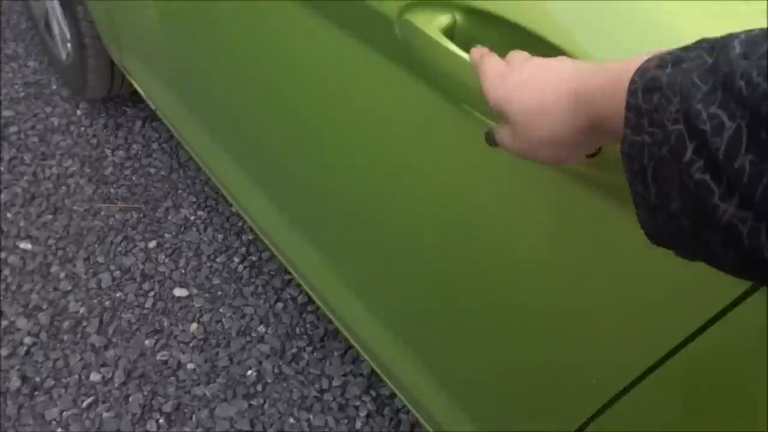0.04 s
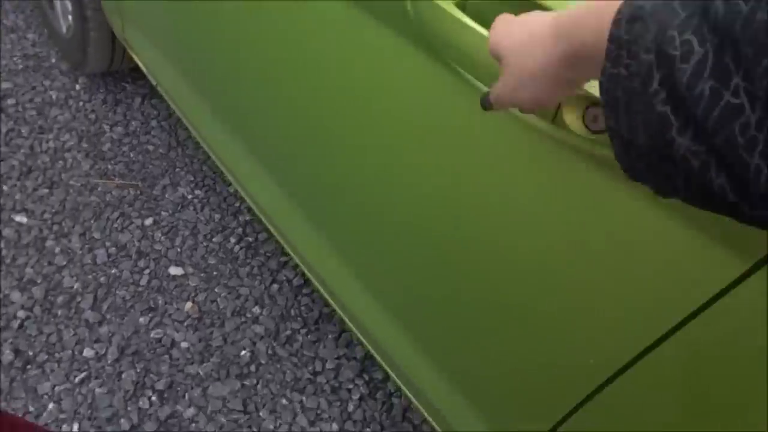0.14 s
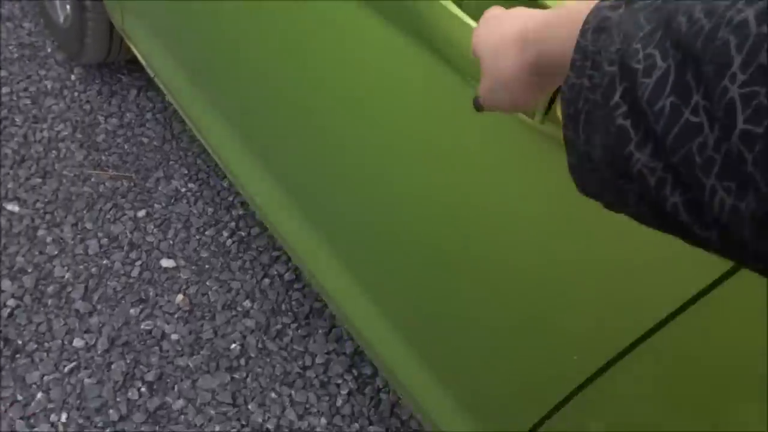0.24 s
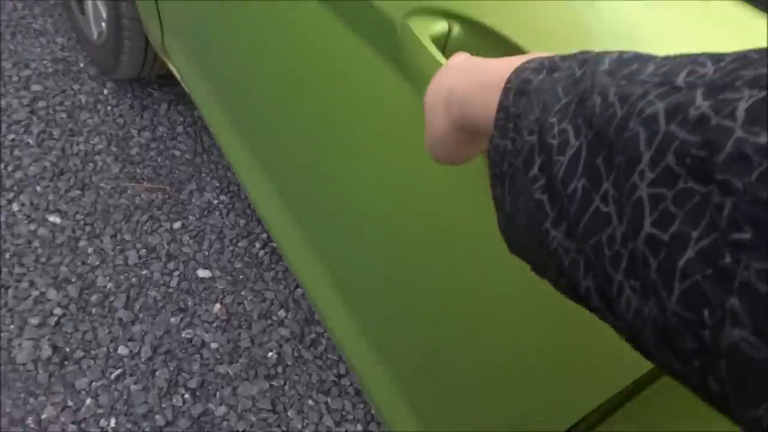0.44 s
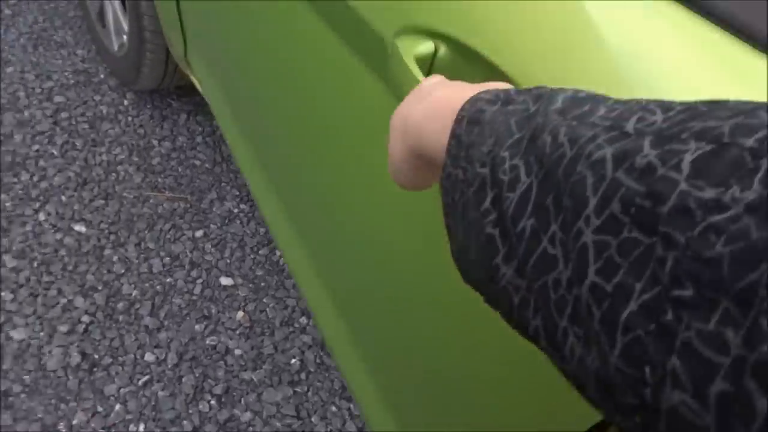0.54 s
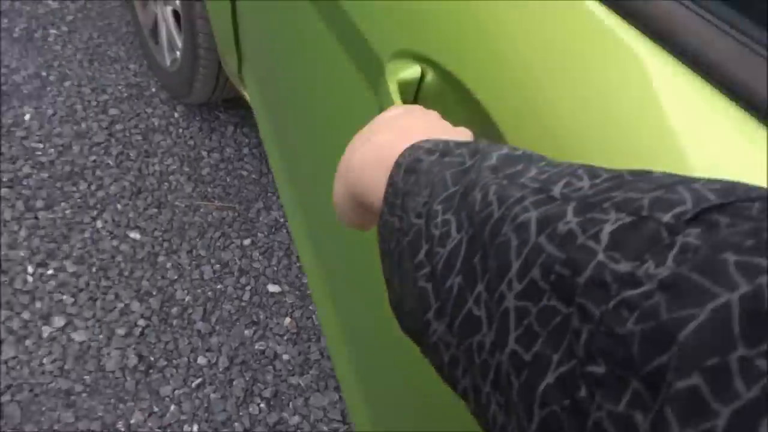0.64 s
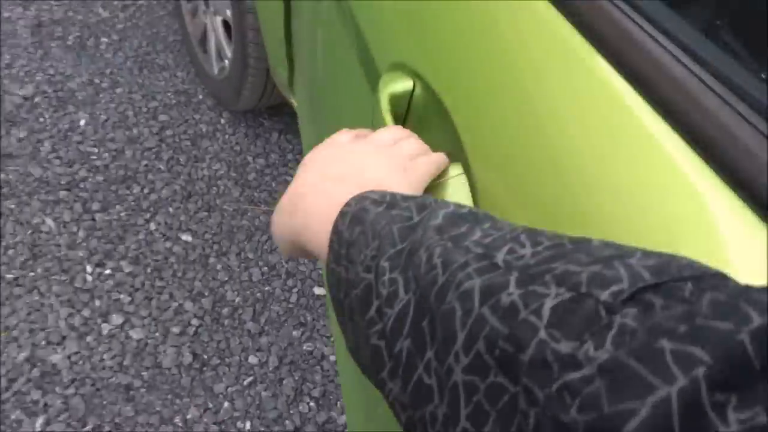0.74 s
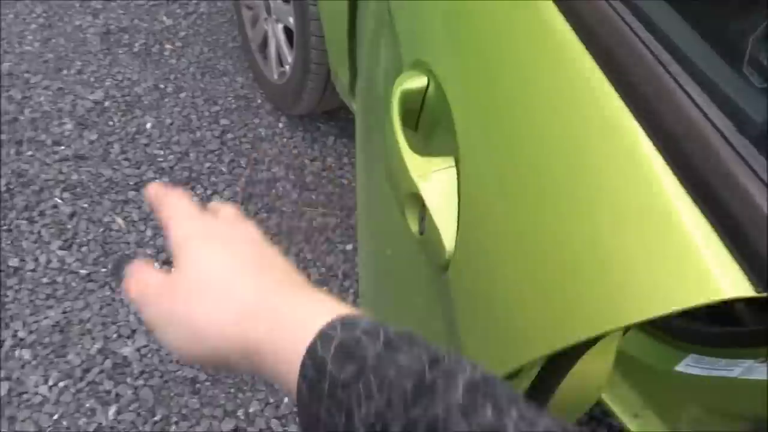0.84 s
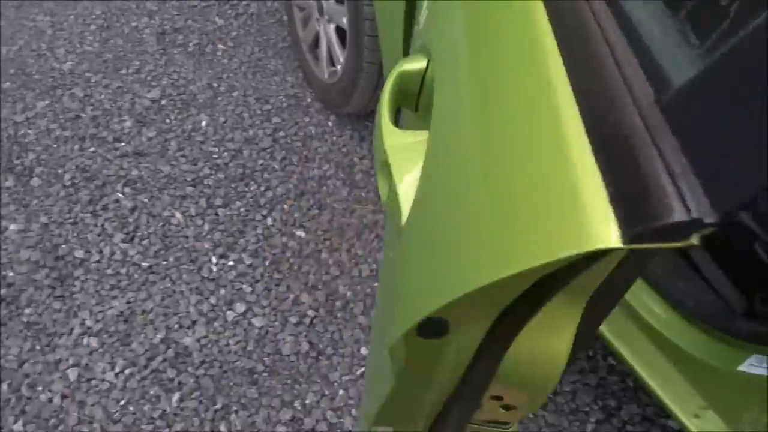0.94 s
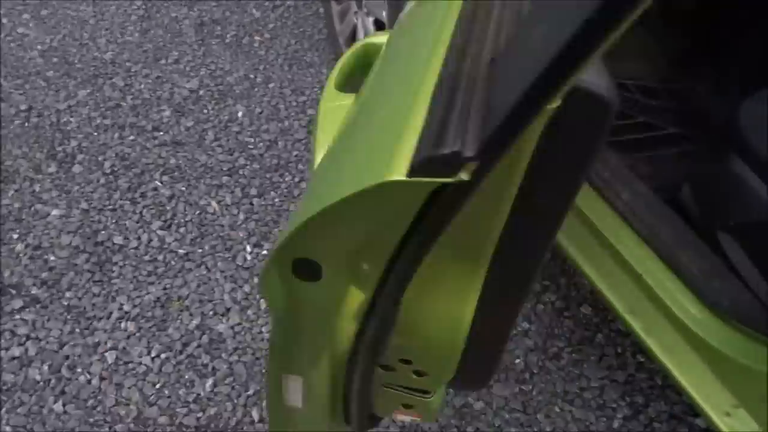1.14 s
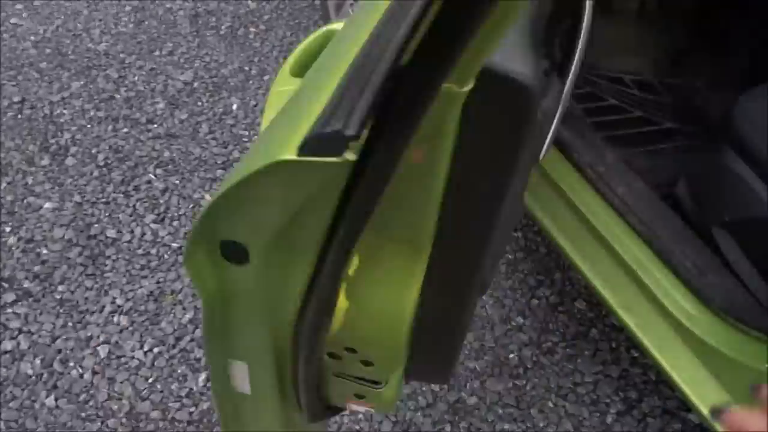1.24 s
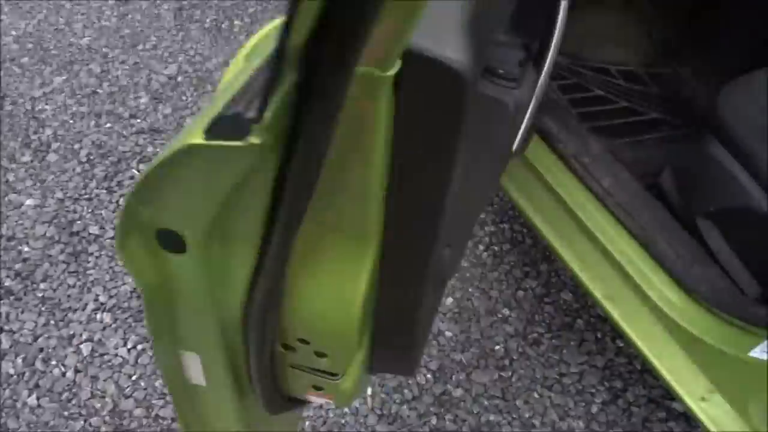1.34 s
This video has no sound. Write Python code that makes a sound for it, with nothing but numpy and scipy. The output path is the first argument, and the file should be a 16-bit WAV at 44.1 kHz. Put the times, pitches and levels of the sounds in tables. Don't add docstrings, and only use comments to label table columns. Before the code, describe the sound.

Car door opening up close: muffled latch knocks, a hard handle clack, sleeve rustle and wind puffs

```python
import sys
import numpy as np
from scipy import signal
from scipy.fft import rfft, irfft
from scipy.io import wavfile
from scipy.ndimage import uniform_filter1d

SR = 44100
rng = np.random.default_rng(int(sys.argv[2]) if len(sys.argv) > 2 else 0)


def int16_out(signal):
    q = np.round(np.clip(np.atleast_2d(signal).T, -1, 1) * 32767)
    wavfile.write(sys.argv[1], SR, q.astype(np.int16))


def boost_factor(decibels):
    exponent = np.asarray(decibels, float) / 20
    return 10 ** exponent


N = 61739

# [pitch_hz, level_db]
AIR_SPECTRUM = [(20, -31), (59, -3.5), (215, -12), (600, -27.5), (1200, -32.5), (3100, -40), (11000, -51)]
# [pitch_hz, level_db]
AIR_SIDE_SPECTRUM = [(60, -14.5), (500, -7), (2000, -2.0), (8000, 2.5)]
# [time_s, level_db]
WIND = [
    (0, 6),
    (.1, -8),
    (.7, 5.5),
    (.8, -5.5),
    (.97, -25),
    (1.07, 5),
]
# [centre_s, level_db, pitch_hz, length_cycles]
EDDIES = [(0.022, -35, 143, 1.84), (0.175, -37.5, 120, 0.58), (0.202, -38.5, 94.4, 4.9),
          (0.663, -33, 121, 0.83), (1.055, -32, 125, 1.9), (1.066, -35.5, 200, 2), (1.078, -29.5, 277, 2.7),
          (1.083, -25.5, 219, 0.96), (1.134, -35.5, 199, 1.5), (0.269, -31, 76.5, 0.31),
          (0.319, -27.5, 70, 0.77), (0.589, -44.5, 67, 2.5), (1.091, -33, 164.5, 4.6),
          (1.109, -34, 169, 1.2), (1.141, -22, 190, 1.75), (1.156, -34.5, 52.3, 0.98),
          (1.185, -33, 184, 0.8), (1.198, -41, 94.5, 2.6), (1.22, -44.5, 103, 2.4), (1.243, -39, 112, 0.83),
          (1.296, -39.5, 163, 1.74), (1.313, -34, 110, 1.6), (1.33, -41, 70, 1.4),
          (1.357, -28.5, 197, 1.28), (1.37, -34, 228, 0.57), (1.381, -39, 70, 1.25),
          (.676, -38.5, 72.6, 1.4), (.235, -32.5, 70, 1.1), (0.499, -37.5, 126, 1.4), (0, -35, 70, 0.45),
          (.702, -42.5, 148, 2)]
# [time_s, level_db]
HAND_STRAIN = [(0, -54), (.1, -47.5), (.19, -50.5), (.26, -36), (.34, -34.5), (.41, -41.5), (.5, -48.5),
               (.7, -54.5), (.87, -46.5), (.95, -49), (1.02, -54), (1.1, -49), (1.28, -67)]
# [pitch_hz, level_db, t60_s]
PANEL_MODES = [(120, -7.5, 0.28), (158.2, 0, 0.084), (205, 4, 0.029), (288, 2, 0.032), (367, -4.5, 0.056),
               (447, -3.5, 0.039), (542, -3.5, 0.037), (630, -7.5, 0.07), (769, 0.5, 0.012),
               (1090, -14.5, 0.022), (1180, -28, 0.022), (1593, -11, 0.031)]
# [time_s, level_db]
ARM_SPEED = [(0, -68), (.06, -69), (.13, -60.5), (.22, -60.5), (.33, -56.5), (.4, -65.5), (.46, -71),
             (.74, -75.5), (.86, -57.5), (.95, -57), (1.05, -51), (1.2, -52.5), (1.26, -60), (1.3, -71)]
# [pitch_hz, level_db]
CLOTH_SPECTRUM = [(400, -18), (800, -10.5), (1300, -3.5), (2200, -5.5), (3600, -6.5), (5200, -12),
                  (11000, -20.5)]
# [time_s, treble_db]
CLOTH_TENSION = [
    (.1, 4),
    (1.04, -8),
    (1.1, 1),
    (1.25, -2),
]
# [time_s, level_over_rustle_db, pitch_hz]
WEAVE_BAND = [(0, 0, 1500), (.08, -1.5, 2298), (.2, -7, 2295), (.3, -25, 2000), (.97, -24, 1700),
              (1.05, -8, 2270), (1.1, -17, 2100), (1.16, -7.5, 3544), (1.25, -7, 2300)]
# [start_s, peak_db, pitch_hz, length_ms]
TRIM_TICKS = [(.007, -40, 1300, 1.3), (.056, -45, 750, 1.2), (.147, -49, 880, 2.3),
              (.505, -53.5, 4400, 1.3), (.547, -47, 4730, 0.62), (.709, -45.5, 3800, 0.35),
              (.762, -54, 2500, 2.7), (.904, -46, 1790, 2.3), (.957, -44, 2000, 1.7),
              (1.126, -32.5, 6300, 1), (1.270, -44, 940, 1.6), (1.382, -49, 4800, 0.71)]
# [start_s,
# peak_db, pitch_hz, t60_ms]
IMPACTS = [(.2125, -35, 766, 53), (0.2189, -27.5, 236, 19), (.232, -30.5, 194, 42), (.2485, -29.5, 666, 44),
           (.2615, -39.5, 3210, 21), (0.261, -33.5, 1827, 27), (0.2671, -22.5, 256, 49),
           (0.2804, -35, 242, 24), (0.3037, -22, 374, 33), (0.3033, -34, 1230, 22), (.3035, -43, 3030, 25),
           (.320, -48, 2370, 14), (.3100, -17.5, 307, 28.5), (.3130, -24.5, 266, 28),
           (0.316, -17.5, 222, 23), (.3195, -18.5, 422, 14), (.3265, -24.5, 432, 32),
           (.337, -30.5, 597, 19), (.349, -24, 276, 35), (0.3569, -39.5, 1705, 31), (.5185, -53.5, 800, 43),
           (.5775, -45, 830, 30), (.6395, -47.5, 665, 28), (0.8151, -25, 1180, 37),
           (.8152, -25, 3130, 21.6), (.817, -28.5, 278, 30), (.855, -32.5, 223, 37), (.8195, -22, 910, 14),
           (0.8222, -27, 1234, 28), (0.8243, -16, 266, 18), (.8300, -23, 630, 36), (.8370, -31.5, 295, 27),
           (.8400, -21, 288, 20), (.849, -32.5, 1220, 26), (0.8477, -34, 1720, 30), (1.0745, -39, 635, 28),
           (1.087, -45.5, 660, 17), (1.093, -41, 298, 27), (1.1352, -35.5, 376, 41), (1.368, -43, 403, 44),
           (1.2685, -41, 980, 10.4), (.449, -48, 1370, 23), (.453, -33.5, 170, 40), (.609, -47.5, 305, 98)]
# [start_s, level_db, contact_ms, rattle_ms]
LINKAGE_BLOWS = [(0.213, -40.5, 0.52, 6.2), (.234, -43, 4.2, 13), (0.25, -38.5, 0.62, 12),
                 (0.259, -30.5, 0.38, 8), (.280, -37.5, 1.7, 51), (0.304, -24, 0.24, 9.9),
                 (0.317, -35.5, 0.38, 5), (0.327, -37, 0.66, 12), (0.349, -36, 1.8, 18),
                 (0.366, -38.5, 1, 2.8), (0.384, -36.5, 0.58, 12.7), (0.449, -45, 0.48, 11),
                 (0.487, -50, 0.37, 5.8), (0.518, -64, 0.16, 6.5), (0.577, -51, 0.37, 10.5),
                 (.640, -50, 1.67, 26), (0.743, -53.5, 0.32, 7.9), (.799, -45, 1.4, 16),
                 (.817, -24, 0.5, 20), (.825, -32, 1.5, 3.9), (0.841, -34, 0.42, 2.1),
                 (0.849, -33.5, 0.21, 21)]
# [start_s, level_db, rattle_ms, crack_over_ring_db]
HANDLE_CONTACTS = [(.217, -54.5, 11, 7), (.247, -58.5, 9.8, 16.5), (0.262, -35, 4.7, -4.5),
                   (.288, -76, 2.7, -1), (0.302, -48, 45, 7.5), (0.32, -52.5, 17.4, 7.5),
                   (0.336, -66, 9.3, 9), (0.352, -56, 10, 7.5), (0.382, -47.5, 2.1, -7.5),
                   (0.8152, -18, 7, -8.5), (0.828, -38.5, 18, 2), (0.843, -37.5, 13, -7.5)]
# [pitch_hz, level_db, t60_s]
HANDLE_MODES = [(650, -3, .03), (990, 3, .035), (1240, -3, .02), (1520, -10, .015), (2023, -5, .035),
                (4470, -12, .012), (5600, -12, .01), (3200, -5, .009)]
# [pitch_hz, level_db]
CRACK_SPECTRUM = [(300, 23.5), (1500, 13.0), (3000, 9.5), (5500, 2.5), (8000, -6.5), (11000, -7)]
# [pitch_hz, level_db]
SCATTER_SPECTRUM = [(100, -34), (250, -21.0), (600, -5.5), (2000, 8.0), (10000, -0.5)]

PAN_DB, PAN_HZ, LAG_HZ = -4.5, 2000, 9200
SIDES = np.array([[1], [-1]])


def level(x, db):
    return x * boost_factor(db) / np.sqrt(np.mean(x ** 2))


def curve(table):
    s, db = np.array(table).T[:2]
    return boost_factor(np.interp(np.arange(N) / SR, s, db))


def colour(x, table):
    hz, db = np.array(table).T
    f = np.maximum(np.arange(x.shape[-1] // 2 + 1) * SR / x.shape[-1], 1)
    gain = boost_factor(np.interp(np.log(f), np.log(hz), db))
    return irfft(rfft(x) * gain, x.shape[-1])


def band_filter(x, order, hz, kind="lowpass"):
    return signal.sosfilt(signal.butter(order, hz, kind, fs=SR, output="sos"), x)


def walk(rate):
    hold = int(SR / rate)
    steps = np.repeat(rng.standard_normal(N // hold + 1), hold)
    return uniform_filter1d(steps, hold)[:N]


def ring(force, modes):
    out = 0
    for hz, db, t60 in modes:
        pole = np.exp(2j * np.pi * hz / SR - np.log(1000) / (t60 * SR))
        out = out + boost_factor(db) * signal.lfilter([1], [1, -pole], force).imag
    return out


def push(x, ms):
    w = np.hanning(max(int(ms * SR / 1000), 1) + 2)
    return np.convolve(x, w / w.sum())[:len(x)]


def burst(ms, noise):
    u = np.arange(len(noise)) / (ms * SR / 1000)
    b = noise * np.exp(-u) * (1 - np.exp(-u / 0.086))
    return b / np.sqrt(np.sum(b ** 2))


def add(out, s, x):
    i = int(s * SR)
    x = x[..., max(-i, 0):]
    i = max(i, 0)
    out[..., i:i + x.shape[-1]] += x[..., :N - i]


def ports(x, lag_us):
    f = np.arange(N // 2 + 1) * SR / N
    tilt = boost_factor(PAN_DB / 2 * f / (f + PAN_HZ))
    delay = np.exp(-2j * np.pi * f / (1 + f / LAG_HZ) * lag_us / 10 ** 6)
    s = rfft(x)
    return np.array([irfft(s * tilt * delay, N), irfft(s / tilt, N)])


def air():
    mid, side, wind = rng.standard_normal((3, N))
    side = colour(side, AIR_SIDE_SPECTRUM)
    floor = level(colour(mid + side * SIDES, AIR_SPECTRUM), -52.5)
    rumble = level(band_filter(wind, 2, [22, 70], "bandpass"), -55.5)
    gusting = boost_factor(3 * walk(13.0)) * curve(WIND)
    return floor + rumble * gusting


def puffs():
    sag, side_db, slip_rad, rough_db = 0.66, -5.5, 0.3, -20.5
    out, swell = np.zeros((2, N)), np.zeros(N)
    for (s, db, hz, cycles), z in zip(EDDIES, rng.standard_normal(60)):
        u = np.arange(-2 * cycles * SR / hz, 2 * cycles * SR / hz) / SR * hz
        turn = 2 * np.pi * u * (1 - sag * u / cycles / 2)
        bell = boost_factor(db) * np.exp(-(2 * u / cycles) ** 2)
        side = boost_factor(side_db) * hz / 190 * np.sin(turn + slip_rad * z)
        add(out, s + u[0] / hz, bell * (np.cos(turn) + side * SIDES))
        add(swell, s + u[0] / hz, bell)
    rough = band_filter(rng.standard_normal((2, N)), 4, 500)
    return out + swell * level(rough, rough_db)


def creak():
    slips_per_s, scatter_db, slip_ms = 700, 3.5, 0.75
    happens = rng.random(N) < slips_per_s / SR
    size = boost_factor(scatter_db * np.minimum(rng.exponential(size=N), 2))
    slips = happens * size * np.sign(rng.standard_normal(N))
    return level(ring(push(slips, slip_ms), PANEL_MODES), 0) * curve(HAND_STRAIN)


def sleeve():
    rustle_db, flicker_db, shared, lag_us, weave_width_hz = 3.5, 1.5, 0.47, 93, 550
    z = rng.standard_normal((3, N))
    z = z * boost_factor(flicker_db * np.array([walk(100) for _ in z]))
    own = z[1:] * boost_factor(PAN_DB / 2 * SIDES)
    both = np.sqrt(shared) * ports(z[0], lag_us) + np.sqrt(1 - shared) * own
    wide = level(colour(both, CLOTH_SPECTRUM), rustle_db)
    dull = signal.sosfiltfilt(signal.butter(2, 2800, fs=SR, output="sos"), wide)
    s, _, pitch = np.array(WEAVE_BAND).T
    hz = np.interp(np.arange(N) / SR, s, pitch)
    carrier = np.cos(2 * np.pi * np.cumsum(hz) / SR)
    band = band_filter(z[0], 2, weave_width_hz / 2) * carrier
    weave = ports(level(band, rustle_db) * curve(WEAVE_BAND), lag_us)
    return (dull + (wide - dull) * curve(CLOTH_TENSION) + weave) * curve(ARM_SPEED)


def ticks():
    out, t = np.zeros(N), np.arange(400) / SR
    for (s, db, hz, ms), z in zip(TRIM_TICKS, rng.standard_normal((30, 400))):
        band = [hz / 2.33, min(hz * 1.58, 15000)]
        click = band_filter(z * np.exp(-t / ms * 1000), 2, band, "bandpass")
        add(out, s, boost_factor(db) * click / np.abs(click).max())
    return out


def thuds():
    rise_cycles = 0.25
    out, t = np.zeros(N), np.arange(4000) / SR
    for s, db, hz, t60 in IMPACTS:
        shape = (1 - np.exp(-t * hz / rise_cycles)) * 1000 ** (-t * 1000 / t60)
        add(out, s, boost_factor(db) * shape / shape.max() * np.sin(2 * np.pi * hz * t))
    return out


def knocks():
    force = np.zeros(N)
    for (s, db, contact, rattle), z in zip(LINKAGE_BLOWS, rng.standard_normal((30, 1500))):
        blow = push(burst(rattle, z * np.abs(z)), contact)
        add(force, s, boost_factor(db) * blow / np.sqrt(np.sum(blow ** 2)))
    return 0.38 * ring(force, PANEL_MODES)


def handle():
    force, crack = np.zeros(N), np.zeros(N)
    for (s, db, rattle, crack_db), z in zip(HANDLE_CONTACTS, rng.standard_normal((30, 2, 1500))):
        add(force, s, boost_factor(db) * burst(rattle, z[0] * np.abs(z[0])))
        add(crack, s, boost_factor(db + crack_db) * burst(rattle, z[1]))
    return 0.5 * ring(force, HANDLE_MODES) + 8 * colour(crack, CRACK_SPECTRUM)


def squeak():
    start_s, level_db, pitch_hz, rub_ms = 0.357, -36, 1636, 27
    rub = np.zeros(N)
    add(rub, start_s, boost_factor(level_db) * burst(rub_ms, rng.standard_normal(3000)))
    return ring(rub, [(pitch_hz, 0, 0.04)])


def scatter(door):
    t = np.arange(int(0.08 * SR)) / SR
    tail = colour(rng.standard_normal((2, len(t))), SCATTER_SPECTRUM) * 1000 ** (-t / 0.036)
    tail = tail * boost_factor(-9) / np.sqrt(np.sum(tail ** 2) / 2)
    return signal.fftconvolve(door[None], tail)[:, :N]


def scene():
    door = knocks() + creak() + handle() + ticks() + squeak() + thuds()
    for _ in range(2):
        door = band_filter(door, 2, 135, "highpass")
    return ports(door, lag_us=46.4) + scatter(door) + puffs() + sleeve() + air()


def band_limit(x):
    return signal.sosfilt(signal.butter(12, 11730, fs=SR, output="sos"), x)


def record(dry):
    top_cut = signal.ellip(10, 0.2, 60, 11050, fs=SR, output="sos")
    mix = signal.sosfilt(top_cut, dry)
    return band_limit(mix)


dry = scene()
out = record(dry)
int16_out(out)
```